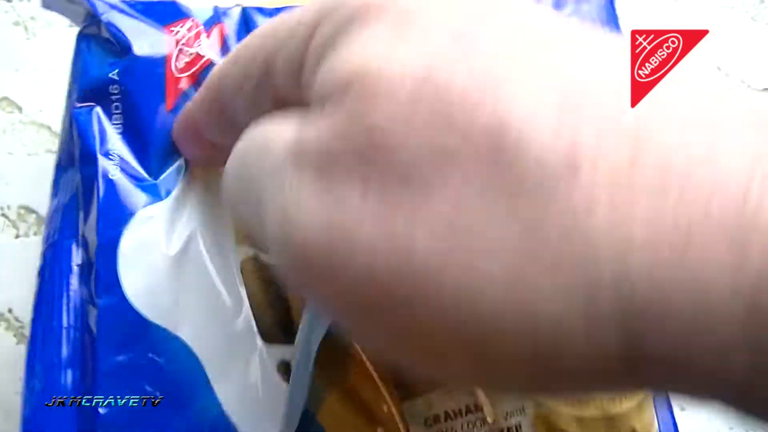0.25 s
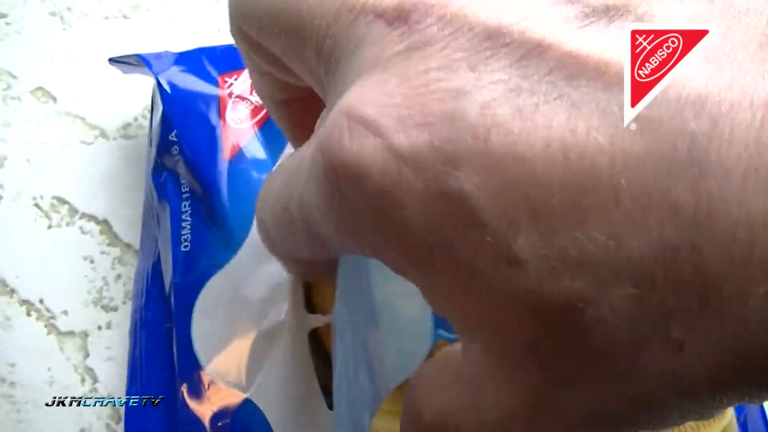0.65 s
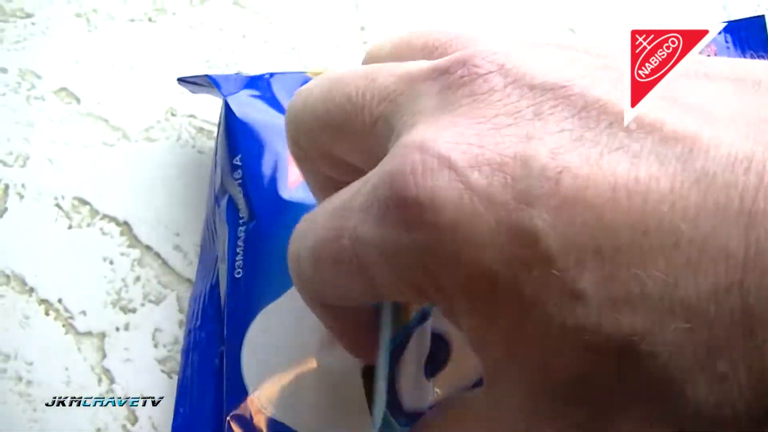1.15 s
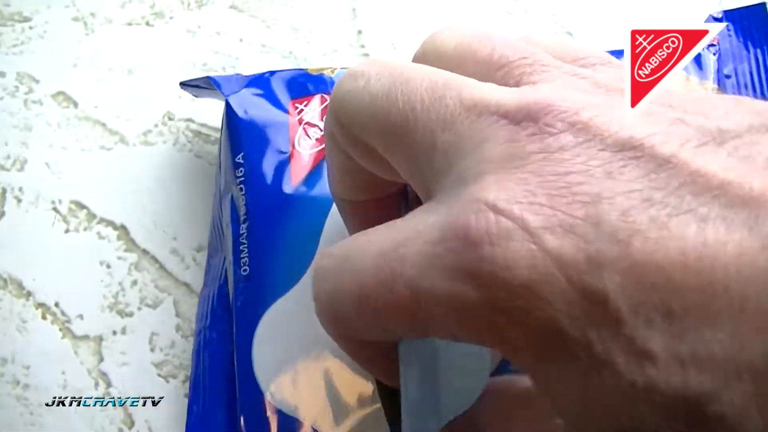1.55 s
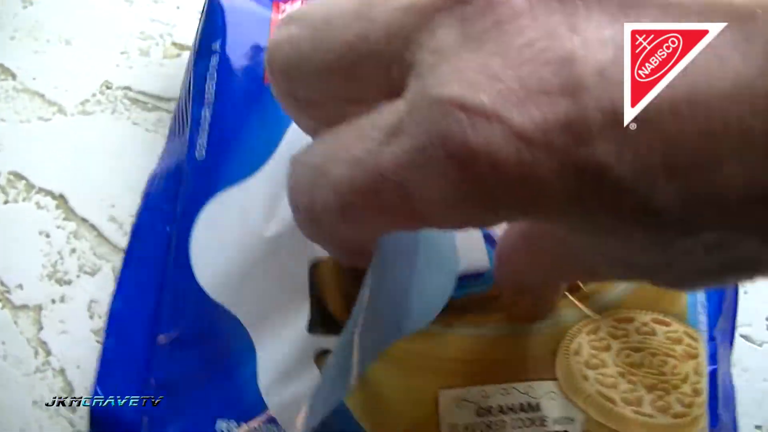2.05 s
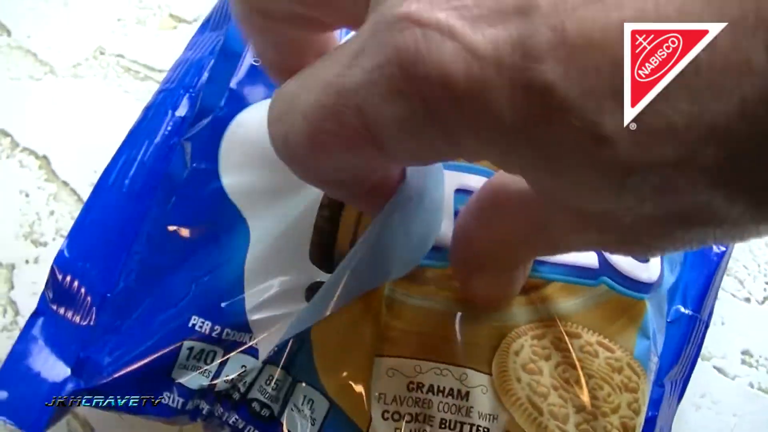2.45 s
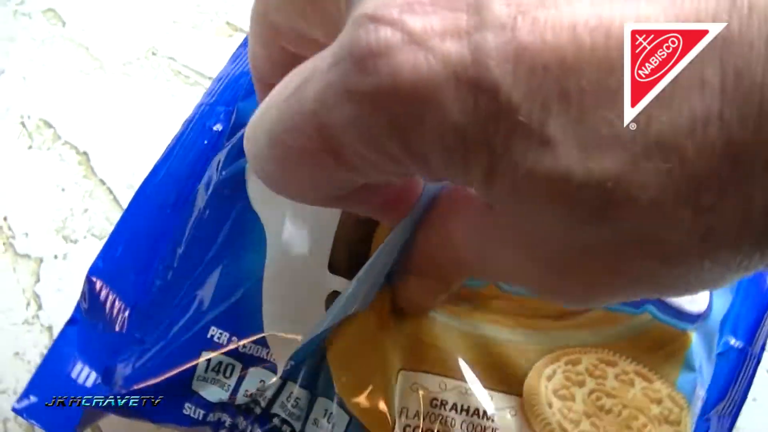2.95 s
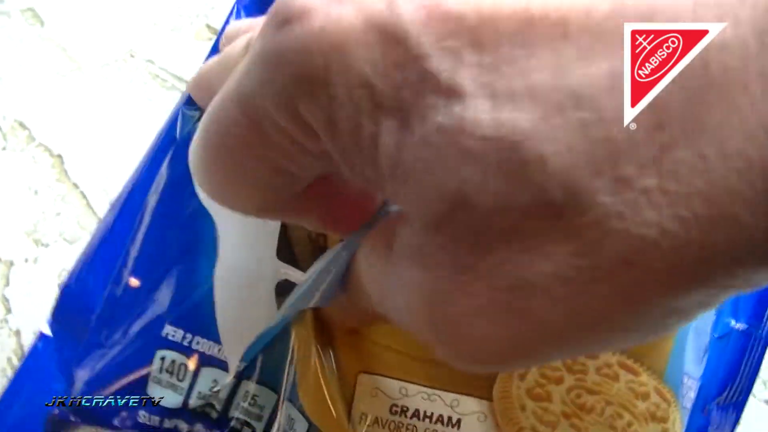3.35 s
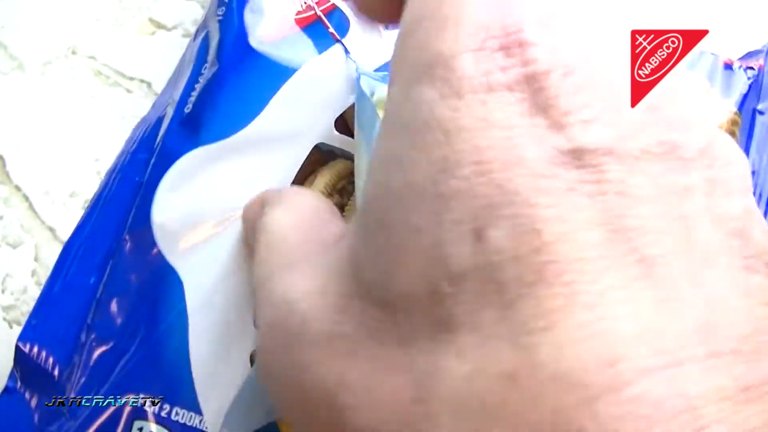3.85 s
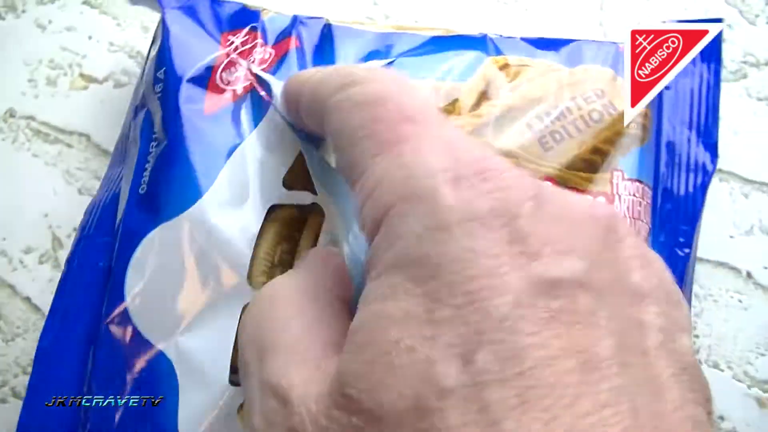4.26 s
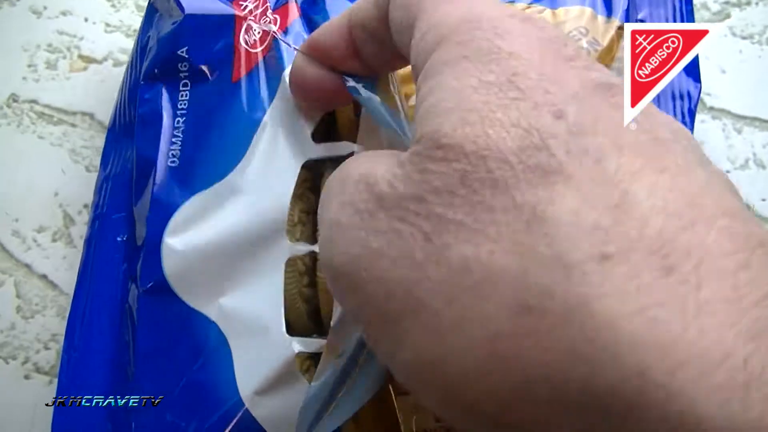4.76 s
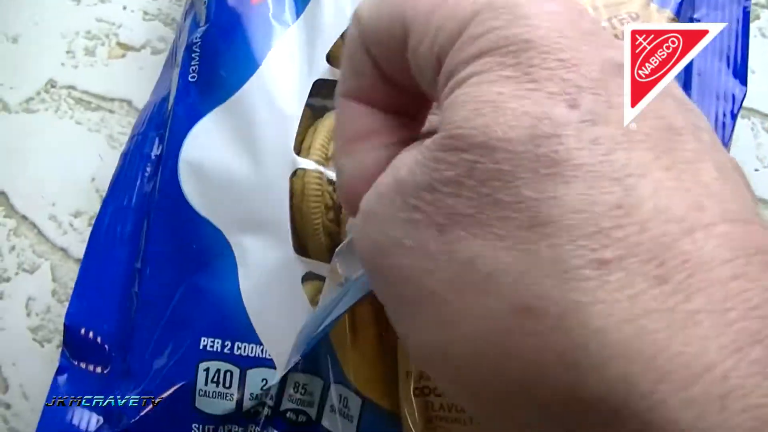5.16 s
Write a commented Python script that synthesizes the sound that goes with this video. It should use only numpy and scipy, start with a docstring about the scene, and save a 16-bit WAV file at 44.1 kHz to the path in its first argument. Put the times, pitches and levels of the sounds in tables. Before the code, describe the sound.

Very close, a hand peels the resealable film of a biscuit pack. Crisp plastic crackles come in short uneven pulls, with stiff creases snapping and fine bright ticks between. A brief fingertip squeak and low tray bumps fall early on, then more pulls, snaps and thuds towards the end. Small, fairly dry room with faint low rumble, nearly centred sound.

```python
"""Peeling a film lid

A hand peels back the film lid of a plastic biscuit pack on a counter, close by, in short pulls.
Each pull flexes the film into decaying pops that grow denser with the effort; stiff creases snap.
Slack folds pop roundly, a fingertip squeaks once, and bumps shake the tray with thuds and noise.
The energy lingers band by band in the pack and a small room, over a quiet low rumble."""
import sys
import numpy as np
from scipy import signal
from scipy.fft import rfft, irfft
from scipy.io import wavfile
from scipy.ndimage import uniform_filter1d

SR = 44100
rng = np.random.default_rng(int(sys.argv[2]) if len(sys.argv) > 2 else 0)


def output_pcm(signal):
    """Save a mono or channel-first signal as 16-bit PCM at the path in sys.argv[1].

    Samples are clipped to [-1, 1] before scaling.
    """
    pcm = np.clip(np.atleast_2d(signal).T, -1, 1) * 32767
    wavfile.write(sys.argv[1], SR, np.round(pcm).astype(np.int16))


N = 238340
TIME = np.arange(N) / SR
# a flipped facet decays by 60 dB in so many cycles; gain of its side modes against the main one
RING_CYCLES, SIDE_MODE_GAIN = 7.6, 0.62


# creases that buckle:
# (time [s], relative body level [dB], facet pitch [Hz], relative edge tick level [dB])
CREASE_SNAPS = [(0.2685, -14.5, 3270, -20), (0.289, -23, 1540, -13), (0.3205, -12.5, 1570, -10.5),
                (0.331, -17.5, 2560, -26), (0.3599, -15, 1890, -17), (0.5446, -17, 1650, -21),
                (0.569, -16, 2330, -16.5), (0.763, -21.5, 1920, -36), (0.7778, -16.5, 1870, -15),
                (0.8886, -15.5, 1380, -12.5), (1.0604, -15.5, 1800, -22), (1.1066, -18.5, 2050, -23),
                (1.149, -12, 1800, -22), (1.165, -16.5, 2100, -23), (1.1744, -14, 1860, -25),
                (1.3545, -18.5, 1640, -19), (1.413, -29, 1850, -22), (1.551, -14, 2600, -22),
                (1.7306, -17, 2210, -16.5), (2, -20.5, 1810, -18.5), (2.015, -13.5, 2130, -20),
                (2.0415, -12, 1590, -13.5), (2.1866, -19.5, 1900, -25), (2.279, -19.5, 1500, -22.5),
                (2.299, -17.5, 2270, -22.5), (2.34, -16, 2280, -15.5), (2.3639, -9.5, 1800, -15.5),
                (2.3999, -22, 1490, -19), (2.4087, -15.5, 2340, -19), (2.463, -16.5, 1130, -15.5),
                (2.608, -17.5, 1400, -19), (2.796, -19, 1510, -21), (2.97, -16, 1560, -21),
                (3.1322, -15.5, 2510, -24), (3.4214, -12, 1960, -17.5), (3.509, -12.5, 1980, -20),
                (3.602, -18, 3500, -10.5), (3.676, -19, 1510, -14.5), (3.8227, -18.5, 2060, -20.5),
                (3.8932, -20, 1550, -20), (3.9829, -20, 1490, -17.5), (4.265, -18, 1680, -24),
                (4.6644, -21, 1960, -23), (4.792, -17, 1490, -18), (4.831, -12.5, 2070, -14.5),
                (5.037, -8.5, 1680, -8.5), (5.3167, -19.5, 1660, -16.5)]
# sharp creases that only flick, thin and bright: (time [s], relative tick level [dB])
CREASE_TICKS = [(0.04, -28), (0.102, -29.5), (0.278, -19), (0.653, -32), (0.673, -24), (0.772, -21.5),
                (1.4513, -19), (1.7608, -16.5), (1.884, -24.5), (1.902, -18), (2.025, -24), (2.056, -22.5),
                (2.233, -12.5), (2.2499, -15.5), (2.682, -20.5), (2.707, -19), (2.8111, -12.5),
                (2.901, -16), (3.046, -15.5), (3.0843, -15.5), (3.1203, -22), (3.227, -20), (3.291, -20),
                (3.471, -16.5), (3.526, -15.5), (3.738, -20.5), (3.8582, -16.5), (4.073, -14.5),
                (4.199, -24), (4.402, -15), (4.419, -17), (4.4636, -12.5), (4.5, -13.5), (4.865, -12),
                (4.936, -17.5), (5.158, -24.5), (5.221, -19.5)]


def snaps(body_db=-1.0, tick_db=-3.0, tick_hz=8000, flick_body_db=-5, flick_body_hz=2000,
          stutter_db=-8.5, stutter_s=0.0019, scatter=0.48, broadening=0.44, count=3):
    """Snap-through buckling: a facet pops, its crease ticks, and weaker slips fall just before or after."""
    flicks = [(s, db + flick_body_db, flick_body_hz, db) for s, db in CREASE_TICKS]
    s, body, hz, tick = np.transpose(CREASE_SNAPS + flicks)
    # the stronger the tick against the body, the broader the pop, up to equal levels
    spread = scatter * from_db(broadening * np.minimum(tick - body, 0))
    out = 0
    for step in range(count):
        at = s + (step > 0) * stutter_s * rng.standard_normal(len(s))
        pops = facets(hz, RING_CYCLES, spread)
        tick_pitches = tick_hz * np.exp(0.19 * rng.standard_normal(len(s)))
        ticks = facets(tick_pitches, RING_CYCLES, scatter / 2)
        body_sound = cut(buckles(at, from_db(body + body_db), pops), 300, "high")
        edge_sound = cut(buckles(at, from_db(tick + tick_db), ticks), 1800, "high")
        out = out + from_db(stutter_db * (step > 0)) * (body_sound + edge_sound)
    return out


def facets(hz, cycles, scatter, rise_cycles=0, count=7, size=512):
    """Modal superposition: a facet flips, at once or over rise_cycles, and rings in modes around its pitch."""
    jitter, sign = rng.uniform(-1, 1, (len(hz), 2, count)).transpose(1, 2, 0)
    place = np.arange(count)[:, None] - count // 2  # 0 is the main mode
    detune = (place + jitter * (place != 0) / 2) / 2
    weight = np.where(place == 0, 1, SIDE_MODE_GAIN * np.sign(sign))
    mode_hz = np.minimum(hz * np.exp(scatter * detune), SR / 3)
    turns = mode_hz[..., None] * TIME[:size]
    onset = 1 - fade(turns, rise_cycles) if rise_cycles else 1
    modes = unit_energy(np.sin(2 * np.pi * turns) * onset * fade(turns, cycles))
    pops = np.sum(weight[..., None] * modes, axis=0)
    return unit_energy(pops) * np.sqrt(SR / 200)  # energy of rms 1 over 5 ms


def buckles(times, gains, pops):
    """Linear superposition: each pop is laid down at its own time and gain."""
    out = np.zeros(N)
    for s, gain, pop in zip(times, gains, pops):
        add(out, s, gain * pop)
    return out


def crackle(size_db=5.0, crumple_hz=1800, fine_hz=7600, crumple_db=-2.5, fine_db=1.5,
            hardest_pull_db=-16, rate_follows=.6, count=3000):
    """Crackling noise: many mostly weak buckles, denser under a harder pull, over a soft rustle."""
    crumple, fine = flexing()
    busy = from_db(rate_follows * np.minimum(crumple - hardest_pull_db, 0))
    at = rng.uniform(0, TIME[-1], count)
    happens = rng.random(count) < np.interp(at, TIME, busy)
    sizes = from_db(size_db * np.minimum(rng.exponential(1, count), 3)) * happens
    low, high = rng.standard_normal((2, count))
    pop_shapes = facets(crumple_hz * np.exp(0.4 * low), RING_CYCLES, scatter=0.23, rise_cycles=0.2)
    tick_shapes = facets(fine_hz * np.exp(0.385 * high), cycles=29, scatter=0.514)
    pops = evened(buckles(at, sizes, pop_shapes))
    ticks = evened(cut(buckles(at, sizes, tick_shapes), 3430, "high"))
    broad = from_db(crumple) * (from_db(crumple_db) * pops + rustle())
    return broad + from_db(fine + fine_db) * ticks


# each pull builds up, holds and lets go; a weaker part settles slowly
PULL_ATTACK_S, PULL_RELEASE_T60_S = 0.016, 0.125
SETTLE_DB, SETTLE_T60_S = -10.5, 0.59
# between pulls the held film creaks a little; before the first it is barely touched
HELD_CRUMPLE_DB, HELD_FINE_DB, LIGHT_TOUCH_DB = -37.5, -48.5, -7  # relative levels
# pulls of the hand that flex the film:
# (start [s], length [s], relative crumple level [dB], fine crackle against crumple [dB])
HAND_PULLS = [(0.222, 0.068, -20, -9.5), (0.318, 0.12, -22.5, -8.5), (0.541, 0.13, -33, -4),
              (0.681, 0.026, -24, -4.5), (0.775, 0.24, -31, -8.5), (1.036, 0.17, -31, -4.5),
              (1.348, 0.29, -31.5, -7.5), (1.671, 0.085, -28.5, -2), (2.017, 0.085, -31, -12),
              (2.233, 0.09, -28.5, -19), (2.715, 0.042, -24, -8), (2.88, 0.29, -26.5, -6),
              (3.378, 0.062, -23.5, -9), (3.424, 0.037, -17, -9), (3.49, 0.1, -27, 0.5),
              (3.724, 0.1, -24.5, -7), (3.993, 0.22, -29, -9), (4.218, 0.32, -27.5, -3.5),
              (4.65, 0.06, -28.5, -0.5), (4.847, 0.067, -27.5, -5), (4.955, 0.048, -27, -3),
              (5.03, 0.07, -23.5, -4.5), (5.224, 0.21, -34.5, -6)]


def flexing():
    """Addition of powers: attack, hold and release of every pull sum to crumple and fine levels in dB."""
    grip = from_db(LIGHT_TOUCH_DB * (TIME < HAND_PULLS[0][0]))
    crumple = (from_db(HELD_CRUMPLE_DB) * grip) ** 2
    fine = (from_db(HELD_FINE_DB) * grip) ** 2
    for s, length, db, fine_db in HAND_PULLS:
        since = np.maximum(TIME - s - length, 0)
        settling = from_db(SETTLE_DB) * fade(since, SETTLE_T60_S)
        release = np.maximum(fade(since, PULL_RELEASE_T60_S), settling)
        effort = np.clip((TIME - s) / PULL_ATTACK_S, 0, 1) * release
        crumple = crumple + (from_db(db) * effort) ** 2
        fine = fine + (from_db(db + fine_db) * effort) ** 2
    return 10 * np.log10(crumple), 10 * np.log10(fine)


def evened(x, even_s=0.052):
    """Power normalization: the hand's steady pull evens out the power of the buckling."""
    width = int(even_s * SR)
    power = uniform_filter1d(uniform_filter1d(x ** 2, width), width)
    return x / np.sqrt(np.abs(power) + 1e-18)


def rustle(db=-8.5, low_hz=1150, high_hz=3500, patchy_db=5, shifting_db=6.5, count=10):
    """Friction noise: skin slides on the film, whose resonances come and go as it bends."""
    ringing = 0
    for hz in np.geomspace(low_hz, high_hz, count):
        resonance = resonate(rng.standard_normal(N), hz, 0.3 * hz)
        ringing = ringing + from_db(shifting_db * drift(60)) * resonance / hz
    return from_db(db + patchy_db * drift(100)) * evened(ringing)


# slack folds that flop over without a tick: (time [s], relative level [dB], pitch [Hz])
SLACK_FOLDS = [(0.148, -34, 1660), (0.199, -22, 2900), (0.212, -16.5, 1440), (0.378, -21, 1920),
               (0.448, -15.5, 2540), (0.504, -15.5, 2020), (0.83, -19, 1410), (0.84, -19.5, 1940),
               (0.927, -22.5, 1600), (0.988, -27, 1510), (1.1231, -14, 1470), (1.377, -24, 1470),
               (1.4985, -16, 1700), (1.609, -23.5, 1540), (1.778, -24, 1330), (2.583, -30.5, 1590),
               (2.9973, -11, 2370), (3.485, -19, 1090), (3.775, -20, 1045), (4.1606, -16.5, 5600),
               (4.314, -22, 1170), (4.372, -17.5, 1620), (4.4328, -18.5, 715), (4.908, -24, 1080),
               (5.0775, -18, 3570)]


def folds():
    """Gradual excitation: a slack fold takes a moment to turn over, so its pop is round and pitched."""
    s, db, hz = np.transpose(SLACK_FOLDS)
    return buckles(s, from_db(db), facets(hz, RING_CYCLES, scatter=0.24, rise_cycles=1.8))


def squeak(at_s=.44, length_s=0.059, hz=1330, width_hz=200, db=-21):
    """Friction-driven resonance: a fingertip skids on the taut film and makes it sing for a moment."""
    out, stroke = np.zeros(N), np.hanning(int(length_s * SR))
    singing = rms_one(resonate(rng.standard_normal(len(stroke)), hz, width_hz))
    add(out, at_s, from_db(db) * stroke * singing)
    return out


# colour of the wrapper: (frequency [Hz], gain [dB])
FILM_COLOUR = [(100, -2), (550, 2), (900, -0.5), (2150, 3.5), (2600, -1), (3400, 3.5), (4300, -0.5),
               (6000, 1), (10000, 1), (13000, -2), (16000, -35)]


def film(x):
    """Linear filtering: the wrapper's frequency response colours what the film radiates."""
    return colour(x, FILM_COLOUR)


# bumps of the tray: (time [s], relative level [dB], pitch [Hz], shuffle T60 [s])
TRAY_BUMPS = [(0.353, -6.5, 164, 0.042), (0.889, -16, 460, 0.049), (2.736, -26.5, 300, 0.25),
              (3.44, -8, 132, 0.072), (4.272, -19.5, 345, 0.054), (4.968, -13.5, 362, 0.025),
              (5.047, -16, 320, 0.25), (5.063, -17, 131, 0.16), (5.127, -22.5, 172, 0.24)]


def bumps(rattle=0.62, breadth=0.67):
    """Impact excitation: the tray thuds on the counter and the biscuits shuffle in it."""
    out, t = np.zeros(N), TIME[:SR // 2]
    for s, db, hz, t60 in TRAY_BUMPS:
        thud = np.sin(2 * np.pi * hz * t) * fade(t, 5.1 / hz)
        noise = resonate(rng.standard_normal(len(t)), hz, breadth * hz)
        shuffle = rms_one(cut(noise, 2800, "low")) * fade(t, t60)
        onset = 1 - fade(t, 1 / hz)
        add(out, s, from_db(db) * (thud + rattle * shuffle) * onset)
    return out


TRAY_WIDTH_HZ = 18.7  # bandwidth of each tray mode
# what the filled tray rings with: (frequency [Hz], gain [dB])
TRAY_MODES = [(128, 0), (335, -2.5), (718, -13)]


def tray(x):
    """Sympathetic resonance: the tray rings along with whatever shakes it."""
    return sum(from_db(db) * resonate(x, hz, TRAY_WIDTH_HZ) for hz, db in TRAY_MODES)


ROOM_T60_S = 0.15
# how much left and right differ: (frequency [Hz], relative side level [dB])
STEREO_WIDTH = [(130, -23), (500, -19), (1600, -35.5), (2600, -25), (4500, -11)]


def tails(x, flutter_db=-9, flutter_t60=0.061, room_db=-14, dull_hz=6000, count=14):
    """Reverberant decay: energy lingers briefly as waves cross the pack, longer and duller in the room."""
    out = 0
    for k in range(count):
        hz = 150 * 2 ** (k / 2)
        power = band(x, hz) ** 2
        # flutter dies sooner in the treble; the room is weaker there
        flutter = from_db(flutter_db) ** 2 * linger(power, flutter_t60 / (1 + hz / dull_hz))
        room = from_db(room_db) ** 2 * linger(power, ROOM_T60_S) / (1 + (hz / dull_hz) ** 2)
        mid, side = rms_one(band(rng.standard_normal((2, N)), hz))
        # facets beam their treble unevenly to left and right
        side_gain = from_db(np.interp(hz, *np.transpose(STEREO_WIDTH)))
        apart = side_gain * np.sqrt(linger(power, 0.00069) + flutter + room)
        out = out + np.sqrt(flutter + room) * mid + apart * side * [[1], [-1]]
    return out


def linger(power, t60):
    """Exponential energy decay: power spreads into a tail with the same energy."""
    keep = fade(2 / SR, t60)  # power falls twice as fast as amplitude
    return signal.lfilter([1 - keep], [1, -keep], power + 1e-18)


def rumble(hz=150, width_hz=260):
    """Resonance-shaped noise: the quiet rumble of the room, independent left and right, rms 1 overall."""
    return rms_one(resonate(rng.standard_normal((2, N)), hz, width_hz))


def from_db(db):
    """Logarithmic level: decibels become an amplitude gain."""
    return 10 ** (np.asarray(db) / 20)


def rms_one(x):
    """Mean-square normalization: scale to rms 1."""
    return x / np.sqrt(np.mean(x ** 2) + 1e-20)


def unit_energy(x):
    """Energy normalization: scale each response to energy 1."""
    return x / np.sqrt(np.sum(x ** 2, axis=-1, keepdims=True))


def fade(t, t60):
    """Exponential decay: amplitude falls by 60 dB in t60."""
    return np.exp(-np.log(1000) * t / t60)


def add(out, s, sound):
    """Superposition: mix a sound in at time s."""
    at = max(int(s * SR), 0)
    out[..., at:at + sound.shape[-1]] += sound[..., :N - at]


def resonate(x, hz, width_hz):
    """Damped resonance: one pole pair, with gain about 1 at its peak."""
    r = np.exp(-np.pi * width_hz / SR)
    zeros = np.array([1, 0, -1]) * (1 - r * r) / 2
    poles = [1, -(1 + r * r) * np.cos(2 * np.pi * hz / SR), r * r]
    return signal.lfilter(zeros, poles, x + 1e-18)


def cut(x, hz, kind):
    """Second-order filtering: low- or high-pass."""
    return signal.sosfilt(signal.butter(2, hz, kind, fs=SR, output="sos"), x)


def band(x, hz):
    """Band-pass filtering: half an octave around hz."""
    edges = hz * 2 ** (np.array([-1, 1]) / 4)
    return signal.sosfilt(signal.butter(2, edges, "band", fs=SR, output="sos"), x + 1e-18)


def colour(x, points, size=2048):
    """Minimum-phase filtering: a causal response through (frequency [Hz], gain [dB]) points."""
    hz, db = np.transpose(points)
    bins_hz = np.arange(size // 2 + 1) * SR / size
    gain = from_db(np.interp(np.log(bins_hz + 1), np.log(hz), db))
    cepstrum = irfft(np.log(gain))
    # folding the cepstrum makes the response causal
    cepstrum[1:size // 2] *= 2
    cepstrum[size // 2 + 1:] = 0
    return signal.fftconvolve(x, irfft(np.exp(rfft(cepstrum))))[:N]


def drift(per_s):
    """Slow random modulation: normal values of spread 1, per_s a second, joined by straight lines."""
    knots = rng.standard_normal(N // 20)
    return np.interp(TIME * per_s, np.arange(len(knots)), knots)


def scene(low_hz=88, floor_db=-55):
    """Source, resonator and room: film and tray with their tails, over the rumble."""
    pack = film(snaps() + folds() + crackle() + squeak()) + bumps()
    pack = pack + tray(pack)
    # so small a body radiates little bass
    pack = cut(cut(pack, low_hz, "high"), low_hz, "high")
    return pack + tails(pack) + from_db(floor_db) * rumble()


def record(dry, stopband_hz=16900):
    """Soft saturation and band limiting: the tallest snaps are rounded off and the top is cut."""
    rounded = np.tanh(dry)
    return signal.sosfilt(signal.cheby2(16, 80, stopband_hz, fs=SR, output="sos"), rounded)


dry = scene()
out = record(dry)
output_pcm(out)
```